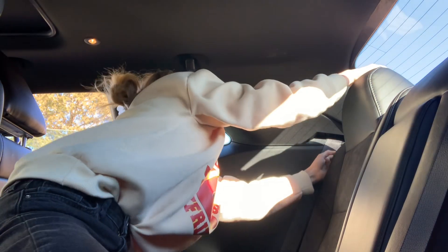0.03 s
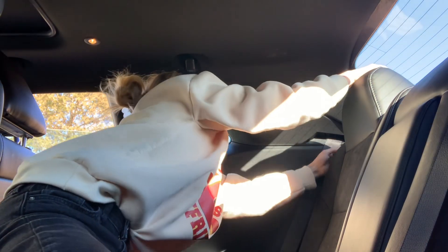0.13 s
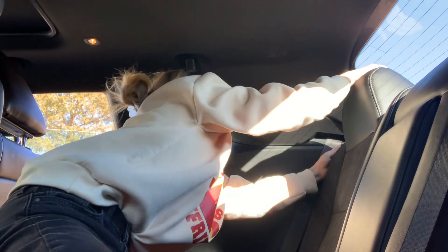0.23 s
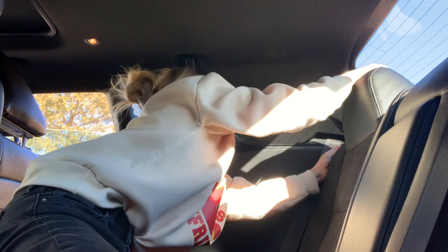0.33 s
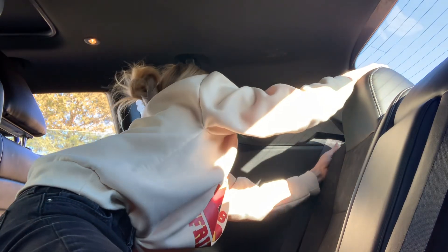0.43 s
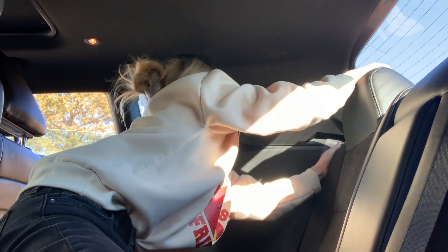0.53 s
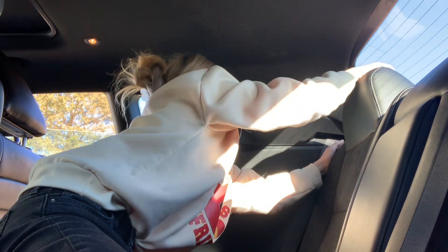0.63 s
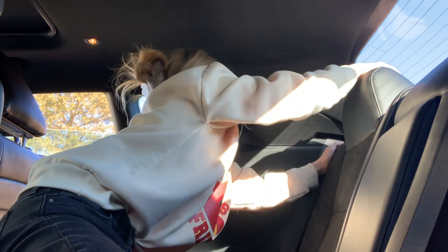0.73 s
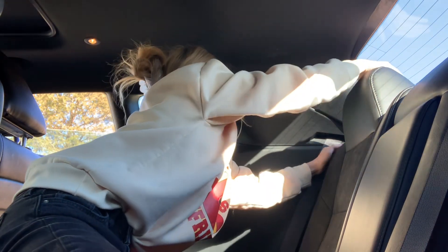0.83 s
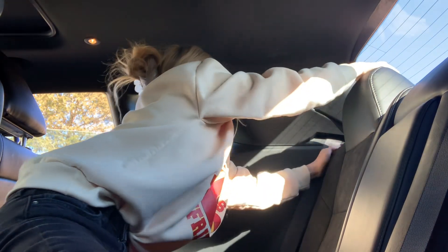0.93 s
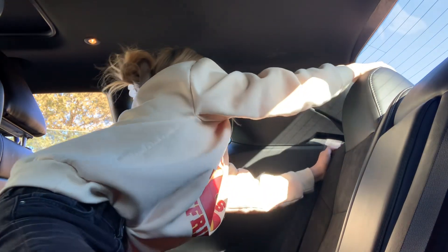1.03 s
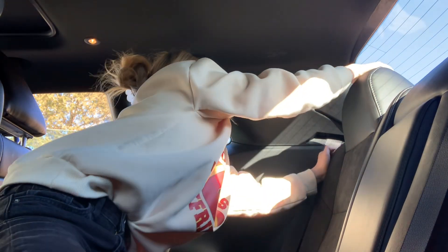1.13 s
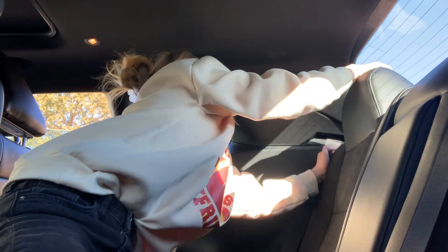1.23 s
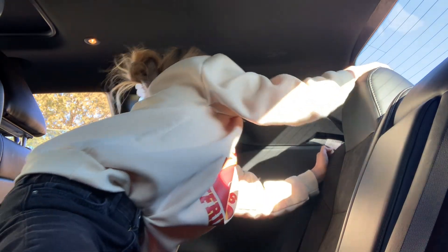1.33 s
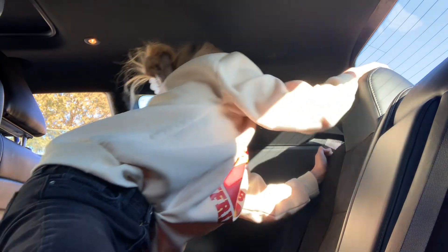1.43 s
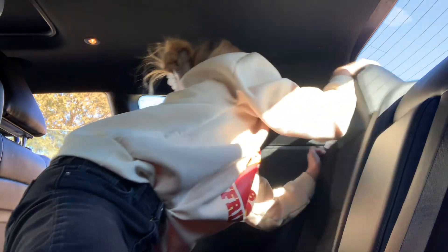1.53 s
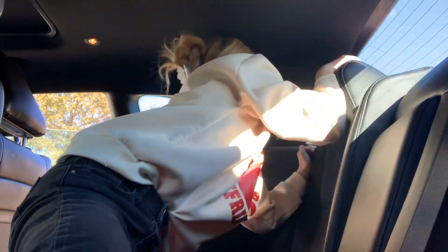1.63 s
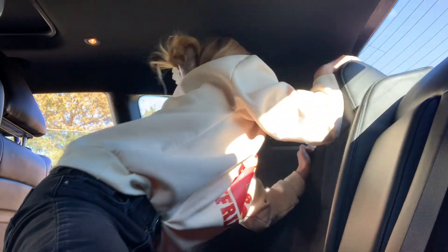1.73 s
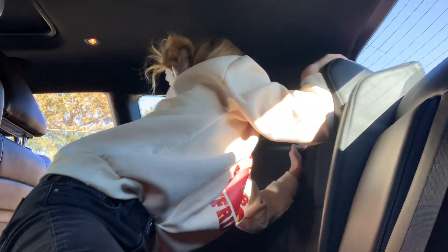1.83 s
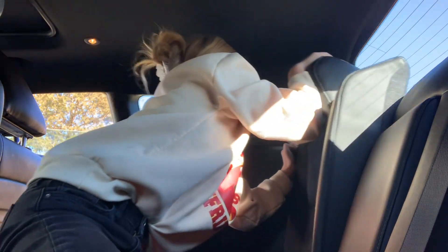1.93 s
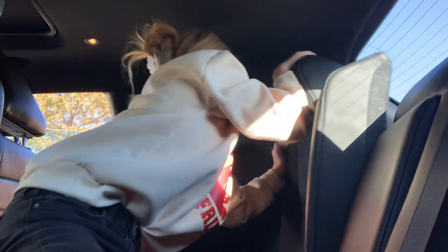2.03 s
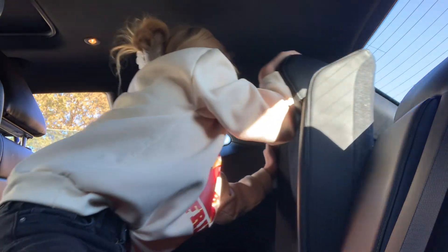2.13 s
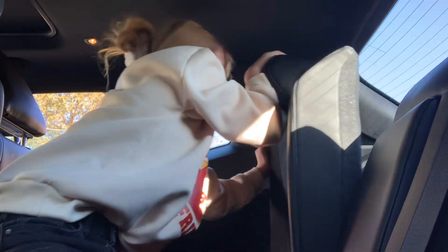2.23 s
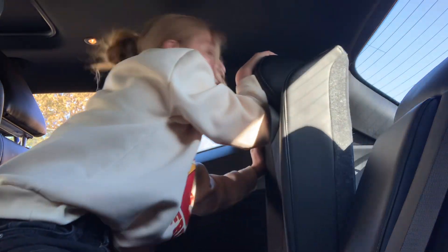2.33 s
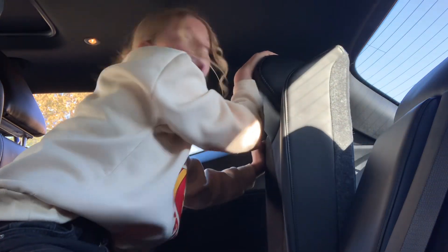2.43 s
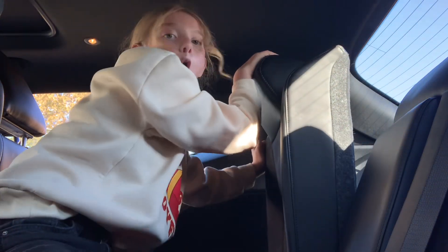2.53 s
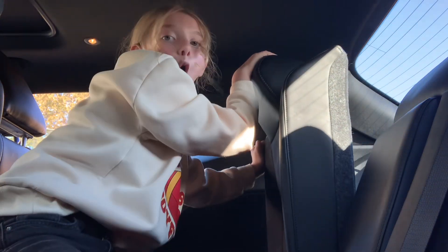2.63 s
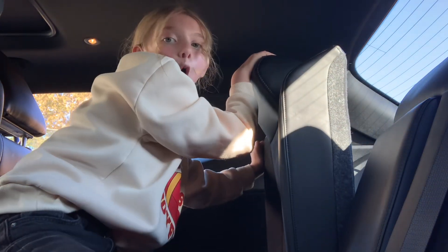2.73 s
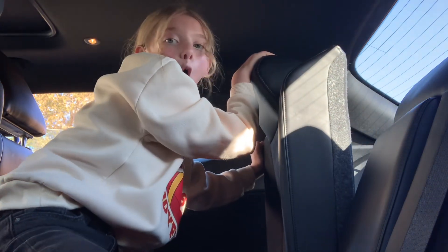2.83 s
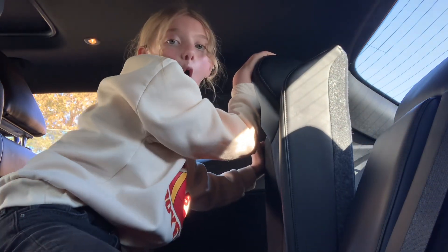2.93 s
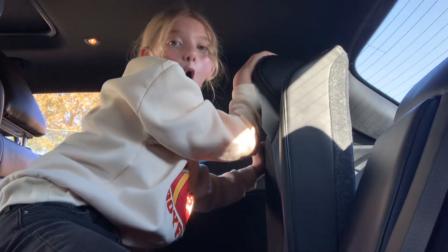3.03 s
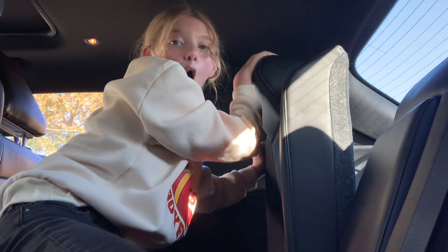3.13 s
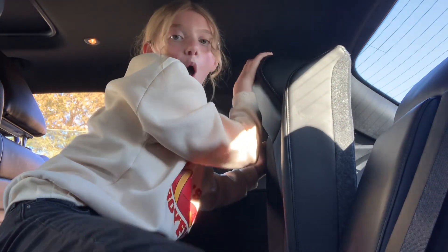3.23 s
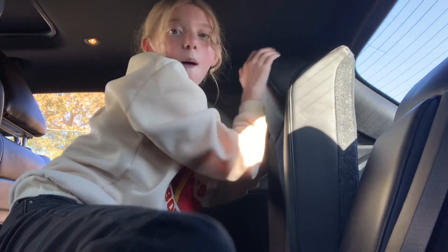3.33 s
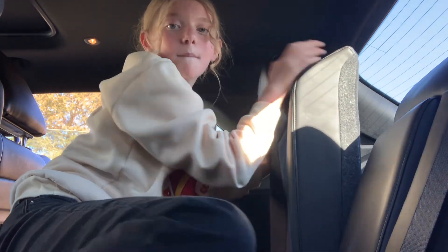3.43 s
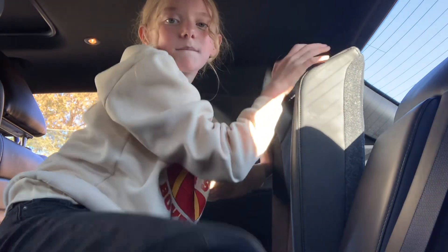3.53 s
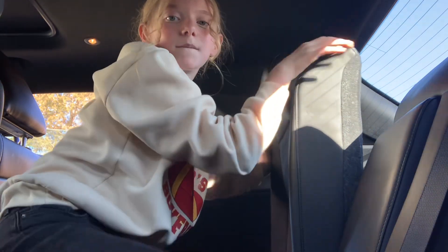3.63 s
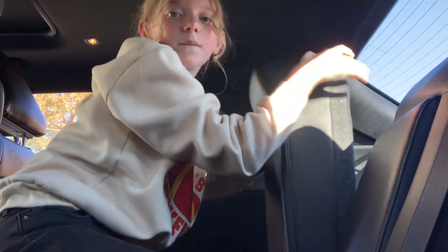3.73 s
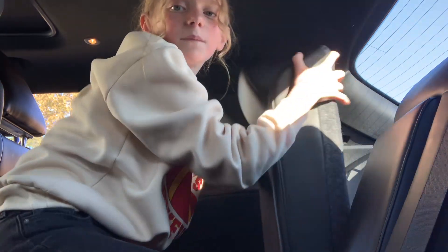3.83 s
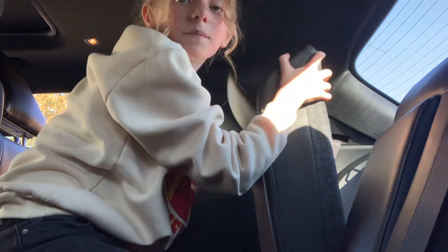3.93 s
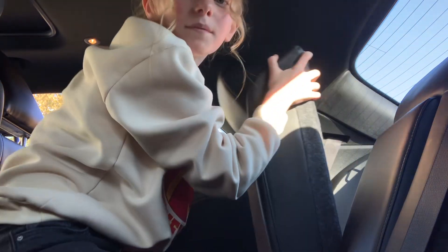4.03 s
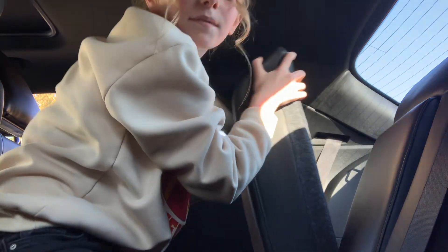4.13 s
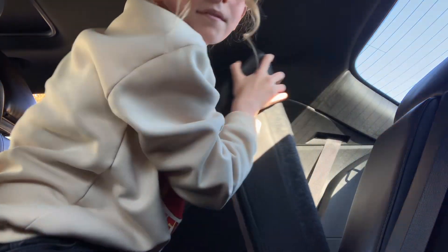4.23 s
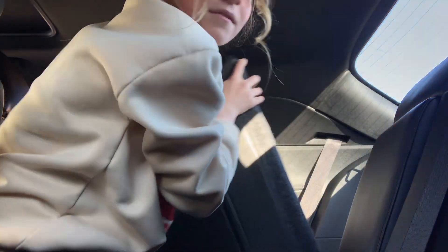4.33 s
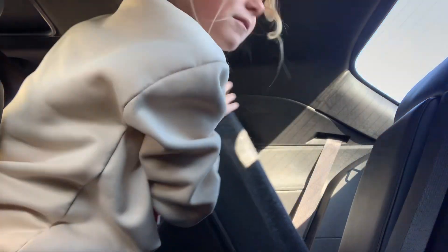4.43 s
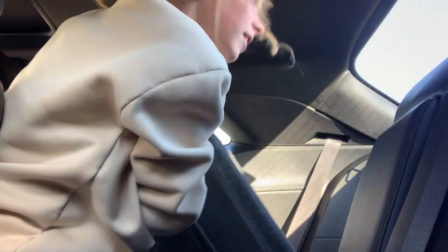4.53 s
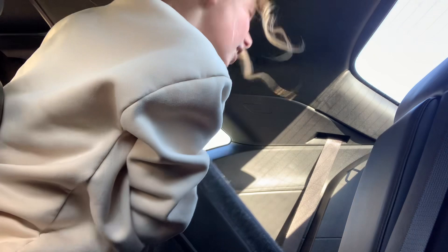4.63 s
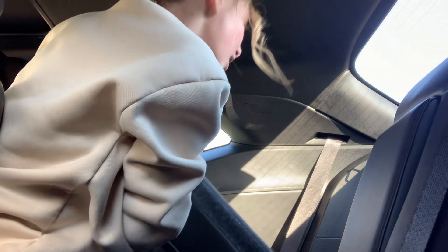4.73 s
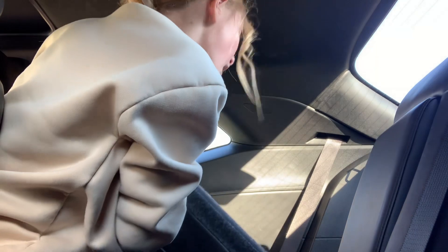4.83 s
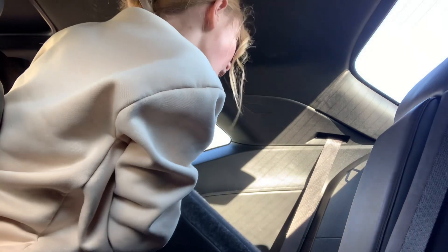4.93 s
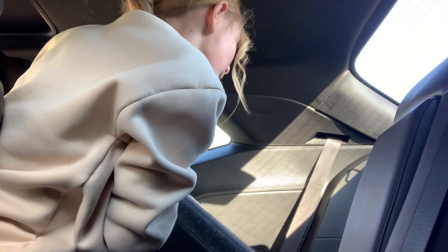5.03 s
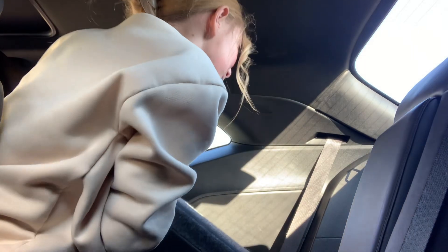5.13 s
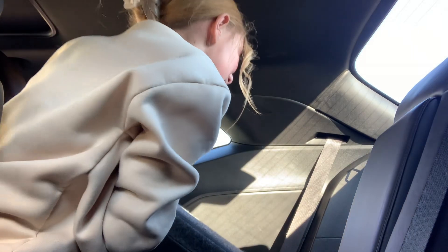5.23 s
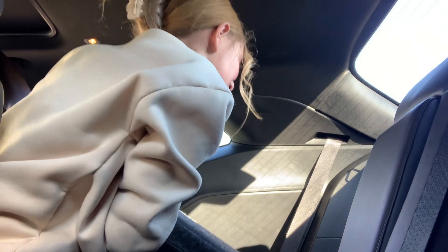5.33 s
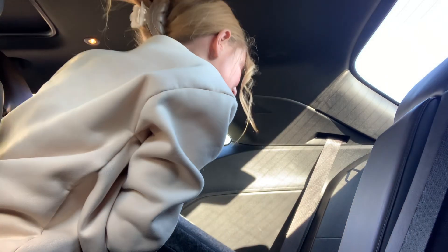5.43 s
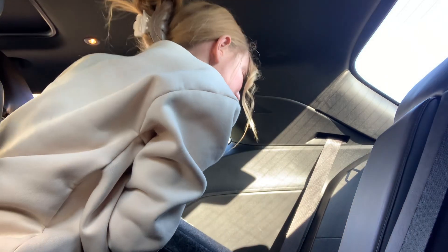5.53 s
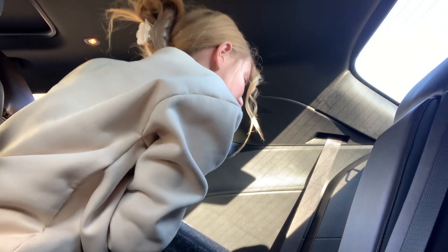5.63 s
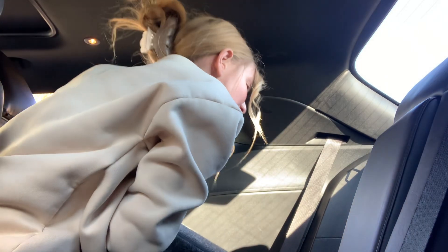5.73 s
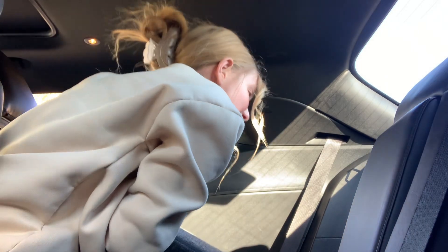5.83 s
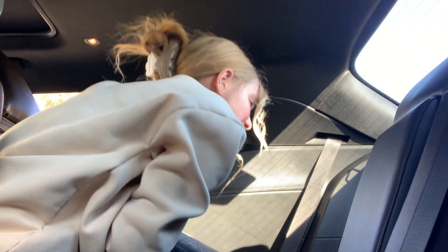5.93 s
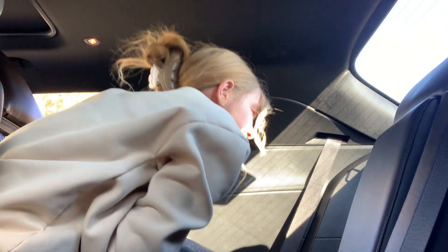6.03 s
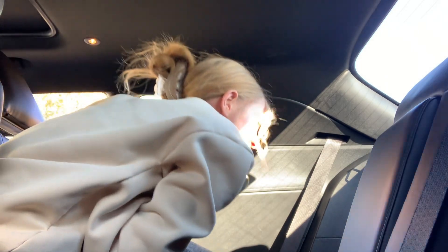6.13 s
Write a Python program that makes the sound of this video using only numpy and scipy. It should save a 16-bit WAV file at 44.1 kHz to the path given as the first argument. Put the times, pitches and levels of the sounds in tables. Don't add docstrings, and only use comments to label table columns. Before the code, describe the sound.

Very close stereo pickup in a dry, upholstered car cabin, with faint air and a low drone beneath. A deep swing of the floor dies away at the start. Around 0.3 to 0.5 s come a cluster of clicks, hollow knocks and dull bumps, then tiny leather squeaks at about 0.55 and 0.85 s. Low shoves and padded thuds return from 1.1 to 1.4 s. At 1.5 s the latch lets go: by far the loudest event, a heavy hollow thump in quick blows, ringing and rattling briefly. Creaking foam and brushing cloth follow until about 2.3 s, then a quieter stretch of faint rumble. From 3.2 s fabric rubs with soft knocks; a crisp, bright latch click with a small thud lands at 4.0 s. Gentle rubbing continues, and from 4.8 s dry crackles begin, growing densest and strongest from 5.8 s to the end near 6.2 s.

```python
import sys
import numpy as np
from scipy import signal
from scipy.fft import rfft, irfft, next_fast_len
from scipy.io import wavfile
from scipy.ndimage import uniform_filter1d

SR = 44100
rng = np.random.default_rng(int(sys.argv[2]) if len(sys.argv) > 2 else 0)


def volts_from_decibels(level):
    exponent = np.asarray(level, float) / 20
    return 10 ** exponent


def wrap_up_sound(samples):
    columns = np.atleast_2d(samples).T
    tamed = np.clip(columns, -1, 1)
    steps = np.round(tamed * 32767).astype(np.int16)
    wavfile.write(sys.argv[1], SR, steps)


N = 272978


def rms_one(x):
    return x / np.sqrt(np.mean(x ** 2) + 1e-20)


def at_hz(points, hz):
    table_hz, db = np.transpose(points)
    return np.interp(np.log(hz), np.log(table_hz), db)


def drift(rate_hz):
    r = np.exp(-80 * np.pi * rate_hz / SR)
    settle = 2000
    noise = rng.standard_normal(N // 40 + settle + 2)
    slow = signal.lfilter([1], [1, -2 * r, r * r], noise)[settle:]
    return np.interp(np.arange(N) / 40, np.arange(len(slow)), rms_one(slow))


def ring(force, hz, t60):
    r = volts_from_decibels(-60 / (t60 * SR))
    w = 2 * np.pi * hz / SR
    return signal.lfilter([0, np.sin(w)], [1, -2 * r * np.cos(w), r * r], force + 1e-18)


def soften(x, hz):
    r = np.exp(-2 * np.pi * hz / SR)
    return signal.lfilter([(1 - r) ** 2], [1, -2 * r, r * r], x)


def colour(x, spectrum):
    hz = np.maximum(np.fft.rfftfreq(N, 1 / SR), 1)
    closed = [(spectrum[0][0] / 2, -60)] + list(spectrum) + [(spectrum[-1][0] * 2, -60)]
    return rms_one(irfft(rfft(x) * volts_from_decibels(at_hz(closed, hz)), N))


def grains(per_s, spread_db):
    size_db = spread_db * np.minimum(rng.exponential(1, N), 5)
    sizes = volts_from_decibels(size_db) * rng.choice([-1, 1], N)
    return sizes * (rng.random(N) < per_s / SR)


def bursts(times, levels_db, t60, rise_s):
    out = np.zeros(N)
    for s, level_db, decay in zip(times, levels_db, np.broadcast_to(t60, len(times))):
        i = round(s * SR)
        decay = max(decay, .005)
        t = np.arange(min(int(2 * decay * SR), N - i)) / SR
        out[i:i + len(t)] += volts_from_decibels(level_db - 60 * t / decay) * (1 - np.exp(-t / rise_s))
    return out


def gestures(rows, rise_db_per_s, fall_db_per_s, rest_db):
    t = np.arange(0, N + 64, 64) / SR
    start, length, level_db, *colours = np.transpose(rows)[:, :, None]
    before_db = rise_db_per_s * np.maximum(start - t, 0)
    after_db = fall_db_per_s * np.maximum(t - start - length, 0)
    power = volts_from_decibels(2 * (level_db - before_db - after_db))
    at = np.minimum(t * SR, N - 1).astype(int)
    total = power.sum(axis=0) + volts_from_decibels(2 * np.broadcast_to(rest_db, N)[at])
    columns = [10 * np.log10(total)] + [(power * c).sum(axis=0) / total for c in colours]
    return [np.interp(np.arange(N) / SR, t, c) for c in columns]


def convolve(x, response):
    size = next_fast_len(N + SR)
    hz = np.maximum(np.fft.rfftfreq(size, 1 / SR), 1)
    return irfft(rfft(x, size) * response(hz), size)[:N]


# frequency in Hz, level in dB per Hz.
CABIN_AIR = [(18, -49), (35, 8.5), (70, -5), (122, -4), (216, -9.5), (500, -31), (1000, -33), (2900, -47.5),
             (5500, -57), (8250, -43), (12300, -53), (12900, -53), (16000, -87)]
# frequency in Hz, level in dB rms.
HUM = [(80.7, -67), (118.4, -63.5)]


def background():
    t = np.arange(N) / SR
    air = volts_from_decibels(-63 + 3.44 * drift(0.52)) * colour(rng.standard_normal(N), CABIN_AIR)
    drone = sum(volts_from_decibels(db + 4.0 + 2.8 * drift(1.46)) * np.sin(2 * np.pi * hz * t + 0.57 * drift(4.1))
                for hz, db in HUM)
    return air + drone


# level in dB, frequency in Hz, t60 in seconds.
EARLIER_SHOVE = (-29.5, 53, 0.39)


def earlier_shove():
    level_db, hz, t60 = EARLIER_SHOVE
    t = np.arange(N) / SR
    return volts_from_decibels(level_db - 60 * t / t60) * np.cos(2 * np.pi * hz * t)


# frequency in Hz, level in dB, t60 in seconds.
FRAME = [(43.75, -13.5, 0.59), (66, -19, 0.91), (74.34, -8.5, 0.29), (105.7, 3.5, 0.068),
         (124.4, -10, 0.097), (209, -24, 0.09)]
# time in seconds, rumble in dB.
WEIGHT = [
    (0, -53),
    (.27, -79),
    (.9, -57),
    (1.9, -65),
    (2.4, -49),
    (2.9, -69.5),
    (3.4, -61),
    (4.4, -49.5),
    (6.19, -59),
]
# start in seconds, length in seconds, rumble in dB.
SHIFTS = [(0.03, 0.013, -48), (.07, 0.11, -50), (.32, 0.04, -41), (.404, 0.034, -54), (.492, 0.017, -43),
          (.6, 0.057, -51), (.755, 0.11, -47.5), (1.011, 0.028, -48), (1.118, 0.081, -45.5),
          (1.23, 0.042, -37.5), (1.37, 0.026, -37.5), (1.45, 0.045, -45.5), (1.59, 0.18, -39.5),
          (1.8, 0.19, -48.5), (2.066, 0.072, -46), (2.14, 0.015, -42.5), (2.38, 0.014, -49),
          (3.17, 0.2, -52.5), (3.457, 0.18, -42), (3.723, 0.036, -44.5), (3.83, 0.011, -46.5),
          (4.102, 0.099, -47), (4.756, 0.016, -47), (4.852, 0.015, -46), (5.083, 0.2, -50.5),
          (5.64, .05, -47), (5.725, .03, -45.5), (5.795, 0.0078, -44.5), (5.91, 0.1, -51)]


def rumble():
    resting_db = np.interp(np.arange(N) / SR, *np.transpose(WEIGHT))
    rumble_db, = gestures(SHIFTS, rise_db_per_s=483, fall_db_per_s=344, rest_db=resting_db)
    shoves = soften(grains(per_s=200.0, spread_db=1.0), hz=300.)
    modes, sign = np.zeros(N), 1
    for (hz, db, t60), tilt_db in zip(FRAME, [-5.0, 8.0, 5.5, 2.0, 13.0, -4.5]):
        modes += sign * volts_from_decibels(db + tilt_db) * ring(shoves, hz, 0.51 * t60)
        sign = -sign
    level = np.sqrt(uniform_filter1d(modes ** 2, size=5000) + 1e-20)
    return volts_from_decibels(rumble_db - 2.06) * modes / level


# frequency in Hz, level in dB, t60 in seconds.
SHELL = [(269, 7, 0.14), (375, 9.5, 0.044), (422.6, -9.5, 0.1), (500, -16.5, 0.22), (574, -11.5, 0.1),
         (749, -18.5, 0.17), (906.5, -6.5, 0.054), (1070, -12, 0.13), (1376, -4, 0.092), (1520, -18, 0.12),
         (1683, -32, 0.06), (1920, 1, 0.0067), (2246, -25, 0.015), (4430, -38, 0.051)]
# frequency in Hz, level in dB per Hz.
CLICK = [(1500, -34), (2500, 15), (4000, 3), (5500, 4.5), (8000, 0.5)]
SNAP = [(4000, 8.5), (6500, 18), (8500, 28.5), (11500, 11.5), (13000, 15), (15500, -17)]
# time in seconds, peak in dB, click in dB relative to it,
# bright snap in dB relative to it, centre of the struck part in Hz.
KNOCKS = [(0.02, -60, -52, -45, 434), (0.035, -52, -36, -38, 500), (0.302, -47, -1.5, -12, 500),
          (0.3082, -41.5, -9, -4.5, 1230), (.312, -32, -15, -48, 490), (0.347, -45.5, -31, -29, 760),
          (0.421, -47.5, -13, -16, 500), (0.454, -36.5, -9, 1, 940), (0.46, -34.5, -14, -30, 584),
          (1.109, -53, -35, -40, 520), (1.14, -48.5, -25, -30, 354), (1.154, -55, -35, -40, 550),
          (1.205, -71, -21, -18, 300), (1.244, -58, -34, -39, 523), (1.341, -58, -35, -39, 300),
          (1.357, -58, -35, -40, 338), (1.49, -53, -19, -33, 2280), (1.497, -50, -29, -30, 1376),
          (1.529, -36, -22, -34, 1376), (1.546, -34, -32, -40, 500), (3.444, -56, -10, -1, 300),
          (3.553, -48, -31, -21, 384), (3.609, -49, -24, -11, 347), (3.841, -70, -13, -2, 280),
          (3.974, -46.5, -2.5, -30, 597), (4.0063, -45, 13.5, -6, 1670), (4.0092, -39.5, 12, -0.5, 1790),
          (4.01, -41, -3, -17, 370), (4.021, -35.5, -44, -40, 278), (4.002, -47, -32, -40, 900),
          (4.035, -60, -25, -30, 690), (4.218, -60.5, -2, -13, 840), (5.731, -59, -35, -35, 300),
          (5.776, -54, -35, -35, 380), (5.846, -48, -30, -40, 527), (5.855, -46, -6, -33.5, 700)]


def knocks():
    s, peak_db, click_db, snap_db, centre_hz = np.transpose(KNOCKS)
    click = bursts(s, peak_db + click_db + 0.5, 0.0043, rise_s=0.000088)
    snap = bursts(s, peak_db + snap_db, 0.017, rise_s=0.00031)
    out = click * colour(rng.standard_normal(N), CLICK)
    out += snap * colour(rng.standard_normal(N), SNAP)
    grit = rng.standard_normal(N)
    for hz, db, t60 in SHELL:
        reach_db = -12.0 * np.abs(np.log2(hz / centre_hz))
        rattle = bursts(s, peak_db + 0.6 * db + reach_db - 14.5, 0.0087, rise_s=0.000086)
        out += ring(np.roll(grit, int(hz)) * rattle, hz, 0.3 * t60)
    return out


# frequency in Hz, level in dB per Hz.
CREAK = [(250, 5.5), (380, -6), (500, -4.5), (620, 0.5), (780, -5.5), (1000, -6.5), (1400, -3),
         (2000, -14.5)]
GROAN = [(120, -39), (190, -5.5), (280, -10), (360, -12.5), (500, -17.5)]
# start in seconds, length in seconds, creak in dB,
# deeper part in dB relative to it.
PRESSES = [(.02, 0.026, -81, 28), (.17, 0.0083, -78.5, 6), (.36, 0.079, -82.5, 15), (.5, 0.11, -84, -16),
           (.75, 0.24, -86, 11.5), (1.1, 0.11, -78, 14), (1.25, 0.22, -85, 18), (1.46, 0.17, -72.5, 0),
           (1.7, 0.26, -72, 3.5), (1.92, 0.17, -73, 6.5), (2.14, 0.33, -78, 2), (2.56, 0.33, -88.5, 3),
           (3.15, 0.12, -80.5, 14), (3.45, 0.32, -76, 4), (3.68, 0.14, -70.5, 4.5), (3.96, 0.037, -71, 0),
           (4.04, 0.016, -77.5, 17), (4.21, 0.22, -85, -14), (4.54, 0.059, -81, 4.5), (4.7, 0.33, -76, -9),
           (4.92, 0.14, -73, -12), (5.1, 0.34, -78, -1.5), (5.72, 0.079, -79.5, 11.5),
           (5.84, 0.038, -76.5, -3), (5.95, 0.28, -74, -9)]


def cushion():
    creak_db, deep_db = gestures(PRESSES, rise_db_per_s=302, fall_db_per_s=252, rest_db=-91.5)
    slips = grains(per_s=2500 * volts_from_decibels(2.5 * drift(25)), spread_db=2.5)
    layers = colour(slips, CREAK) + volts_from_decibels(deep_db - 1.5) * colour(slips, GROAN)
    return volts_from_decibels(creak_db + 3.0) * layers


# time in seconds, level in dB.
THUDS = [(0.032, -40), (0.36, -36), (0.418, -43.5), (0.4757, -31), (.492, -36.5), (0.507, -44),
         (0.519, -39), (1.145, -34.5), (1.247, -34.5), (1.357, -35), (3.556, -57), (3.846, -47),
         (4.017, -37.5), (4.218, -53)]


def thuds():
    s, level_db = np.transpose(THUDS)
    bumps = np.zeros(N)
    bumps[np.round(s * SR).astype(int)] = volts_from_decibels(level_db)
    bumps = soften(bumps, 470.0)
    return -sum(volts_from_decibels(db - 2.0 * np.log2(hz / 70)) * ring(bumps, hz, 0.55 * t60) for hz, db, t60 in FRAME)


# frequency in Hz, level in dB per Hz.
HISS = [(3500, -77), (5000, -2), (6500, -0.5), (8000, -1), (9500, 1.5), (11000, -6.5)]
RUB = [(760, -70), (1300, -5), (2250, -3), (2650, -3.5), (3040, 0.5), (5500, -5.5), (7150, -21),
       (12100, -120)]
SHEEN = [(8500, -0.5), (10000, -5), (11800, -1.5), (12600, -4.5), (13200, -6.5), (15500, -10.5),
         (16000, -41)]
# start in seconds, length in seconds, hiss in dB,
# duller rub in dB relative to it, thin top in dB relative to it.
STROKES = [(.06, 0.097, -80.5, -5, -3), (.415, 0.018, -86, 12, 1), (.93, 0.13, -77, -3.5, -6.5),
           (1.09, 0.085, -75, 3, -0.5), (1.22, 0.32, -78.5, 3.5, -8), (1.51, 0.094, -69, 7.5, 20.5),
           (1.64, 0.056, -69.5, -3, -4.5), (1.75, 0.3, -65.5, 0.5, 10.5), (2.07, 0.11, -67.5, -4, 0.5),
           (2.18, 0.13, -80, 2, -8), (3.17, 0.1, -68.5, -4.5, 2), (3.3, 0.057, -78, -2, -11),
           (3.46, 0.035, -72.5, 1, -1), (3.53, 0.1, -64, -5, -4.5), (3.69, 0.15, -66.5, 1, 3.5),
           (3.955, 0.021, -74, 2, -10.5), (4.02, 0.051, -77.5, 2.5, -13), (4.2, 0.063, -80, 3, 10.5),
           (4.45, 0.45, -74.5, -2.5, -3), (4.92, 0.17, -69.5, -2.5, -4), (5.14, 0.062, -72.5, -0.5, 3.5),
           (5.27, 0.2, -84.5, 8, 11), (5.66, 0.062, -78.5, -2, -2), (5.79, 0.069, -79.5, 6, -2),
           (5.94, 0.076, -71, -2, 12.5), (6.045, 0.0084, -61.5, -1, 7), (6.11, 0.042, -70.5, 4, 5)]


def cloth():
    hiss_db, dull_db, top_db = gestures(STROKES, rise_db_per_s=368, fall_db_per_s=245, rest_db=-85)
    fibres = grains(per_s=12000 * volts_from_decibels(1.2 * drift(17)), spread_db=2.5)
    layers = volts_from_decibels(2.2 * drift(18)) * colour(fibres, HISS)
    layers += volts_from_decibels(dull_db - 1.4 + 1.05 * drift(7.3)) * colour(fibres, RUB)
    layers += volts_from_decibels(top_db - 1.3 + 0.43 * drift(4.7)) * colour(fibres, SHEEN)
    return volts_from_decibels(hiss_db - 0.06 + 0.3 * drift(44)) * layers


# time in seconds,
# level in dB, frequency in Hz, t60 in seconds.
PINGS = [(0.305, -49, 380, .06), (0.309, -39, 500, 0.054), (0.31, -48, 1380, 0.034),
         (0.309, -41, 1090, .04), (0.316, -46, 330, 0.073), (0.328, -45, 434, 0.036),
         (0.348, -45.5, 490, .04), (0.414, -50, 483, .04), (0.424, -62, 554, .05), (0.35, -66, 1440, .03),
         (0.456, -55, 1500, .03), (0.457, -50.5, 787, 0.072), (0.458, -62, 470, .04),
         (0.464, -54, 400, 0.029), (1.001, -45, 188, 0.12), (1.4905, -36, 2300, .035),
         (1.4898, -21, 374.6, 0.1), (1.491, -16, 275, 0.154), (1.493, -28, 176, 0.28),
         (1.4955, -35, 2085, 0.039), (1.4953, -32, 1376, 0.12), (1.498, -35, 450, 0.1),
         (1.5, -31, 712, 0.15), (1.504, -41, 1010, 0.12), (1.505, -46, 1780, .08), (1.507, -52, 2580, .06),
         (1.519, -30.5, 415, .08), (1.527, -38.5, 780, 0.043), (1.528, -48, 2080, 0.052),
         (1.533, -48, 2500, 0.056), (1.531, -33, 1376, 0.058), (1.544, -36, 496, 0.11),
         (1.546, -44, 614, .12), (3.551, -54.5, 970, 0.043), (4.005, -41.5, 860, 0.038),
         (4.0066, -40, 1680, 0.079), (4.007, -52, 2110, .04), (4.005, -44.5, 3130, 0.067),
         (4.0087, -60, 4110, .05), (4.009, -35, 401, 0.1), (4.01, -51.5, 519, 0.28),
         (4.011, -52, 670, 0.066), (4.012, -32.5, 257, 0.11), (4.02, -58, 1390, 0.082),
         (4.027, -59, 1004, 0.083)]


def pings():
    out = np.zeros(N)
    for s, level_db, hz, t60 in PINGS:
        i = round(s * SR)
        pluck = np.zeros(min(SR // 2, N - i))
        pluck[0] = volts_from_decibels(level_db)
        out[i:i + len(pluck)] += ring(soften(pluck, 2 * hz), hz, t60)
    return out


# start in seconds, length in seconds, start pitch in Hz, end pitch in Hz,
# level in dB.
SQUEAKS = [
    (0.541, 0.073, 455, 450, -75),
    (0.832, 0.036, 470, 449, -76),
    (3.96, 0.027, 397, 370, -77),
    (5.226, 0.082, 1330, 1437, -84),
]


def squeaks():
    out, waver = np.zeros(N), drift(60)
    loudness_waver = np.roll(waver, SR)
    partials_db = [-19.0, 15.0, -14.0, -2.5, -56, -29, -7.0, -13]
    for s, length, start_hz, end_hz, level_db in SQUEAKS:
        i, n = round(s * SR), round(length * SR)
        hz = np.linspace(start_hz, end_hz, n) * (1 + .01 * waver[i:i + n])
        phase = 2 * np.pi * np.cumsum(hz) / SR
        tone = sum(volts_from_decibels(db) * np.sin(k * phase) for k, db in enumerate(partials_db, 1))
        swell = np.hanning(n) ** .3 * np.linspace(1.3, .6, n)
        out[i:i + n] += volts_from_decibels(level_db + 3 * loudness_waver[i:i + n]) * tone * swell
    return out


# time in seconds, blow on the shell in dB, push into the frame in dB,
# direction as a sign, contact softness in Hz.
RELEASE = [
    (1.48, -43, -54, 1, 942),
    (1.4932, -26, -41, -1, 696),
    (1.4968, -32.5, -16, -1, 576),
    (1.5002, -51, -12, 1, 500),
    (1.508, -45, -42, 1, 500),
    (1.522, -43, -52, -1, 508),
    (1.538, -37.5, -22.5, -1, 400),
    (1.555, -52, -30, 1, 380),
]
# time in seconds, level in dB, t60 in seconds.
RATTLE = (1.505, -61.5, 0.25)


def release():
    blow, push = np.zeros((2, N))
    for s, blow_db, push_db, direction, soft_hz in RELEASE:
        click = np.zeros(N)
        click[round(s * SR)] = np.sign(direction)
        click = soften(click, soft_hz)
        blow += volts_from_decibels(blow_db) * click
        push += volts_from_decibels(push_db) * click
    s, blow_db = np.transpose(RELEASE)[:2]
    shake = bursts(s, blow_db - 22.5, 0.039, rise_s=0.00044)
    shake += bursts(*np.transpose([RATTLE]), rise_s=0.0012) * volts_from_decibels(3.5 * drift(31))
    grit = rng.standard_normal(N)
    out = sum(volts_from_decibels(db) * ring(push, hz, t60) for hz, db, t60 in FRAME)
    for hz, db, t60 in SHELL:
        force = volts_from_decibels(-7.0) * blow + volts_from_decibels(-3.5) * shake * np.roll(grit, int(hz))
        out += volts_from_decibels(db) * ring(force, hz, 0.62 * t60)
    return out + volts_from_decibels(8) * shake * colour(rng.standard_normal(N), CLICK)


# time in seconds, peak in dB, thin top in dB relative to it.
CRACKLES = [(4.776, -61, -25), (4.804, -53, -22), (4.8186, -46, -25), (4.9152, -56, -23), (4.9746, -63, -9),
            (5.005, -52.5, -2), (5.0194, -65, 7), (5.0524, -63, 8), (5.0624, -60, -3), (5.088, -48.5, -10),
            (5.1466, -48, -5.5), (5.1647, -54, -8), (5.181, -44, -15), (5.1974, -55, -16),
            (5.246, -57.5, -8), (5.2653, -60, -2), (5.277, -47, -10), (5.303, -56, 7.5), (5.319, -60, 3),
            (5.3436, -54, -9), (5.3933, -54, -13), (5.405, -56, -2), (5.426, -54, 1), (5.4348, -40.5, -26),
            (5.4574, -64, 1), (5.475, -51.5, -6), (5.5159, -69, 1), (5.572, -66, 2.5), (5.6002, -66.5, 3.5),
            (5.66, -56, -5), (5.68, -49, -17), (5.695, -56.5, -5), (5.761, -52.5, -18), (5.7902, -55, -18),
            (5.805, -62, 2), (5.8162, -53.5, -2), (5.835, -46, -11), (5.8496, -43, -17), (5.8704, -51, -9),
            (5.8888, -50.5, -2.5), (5.9026, -61, -14), (5.9174, -58, 0), (5.9372, -43, -9),
            (5.9602, -42.5, -8), (5.981, -44, -8), (6.0008, -43, -11), (6.0163, -42.5, -8),
            (6.0364, -53, -8), (6.0472, -47, -9), (6.0556, -40, -17), (6.0654, -56, -7), (6.083, -54, 2),
            (6.1053, -42, -8), (6.1164, -59, -5), (6.1274, -50, -8), (6.1468, -41, -23),
            (6.165, -44.5, -12), (6.1747, -46.5, -13)]


def crackles():
    s, peak_db, top_db = np.transpose(CRACKLES)
    slips = grains(per_s=14000.0, spread_db=2.5)
    snap = bursts(s - .0005, peak_db - 5.5, 0.008, rise_s=0.0002)
    tail = bursts(s - .001, peak_db - 10.0, 0.063, rise_s=0.00076)
    top = bursts(s - .001, peak_db + top_db + 3, 0.032, rise_s=0.001)
    return (snap + tail) * colour(slips, HISS) + top * colour(slips, SHEEN)


def cabin(x):
    t = np.arange(SR // 4) / SR
    t60, first_s = 0.045, .002
    tail = rng.standard_normal(len(t)) * volts_from_decibels(-60 * t / t60) * (t > first_s)
    return signal.fftconvolve(x, tail / np.sqrt(np.sum(tail ** 2)))[:N]


# frequency in Hz, level in dB.
UNALIKE = [(30, -6.5), (120, -14), (260, -8.5), (500, -5.5), (800, 7.5), (1200, -7), (2400, 0.5), (4500, 3),
           (9000, -15)]


def own_side(hits, steady):
    paths = sum(drift(5.0) * cabin(steady) for path in range(4)) / 2
    direct_hits = volts_from_decibels(-7) * cabin(hits)
    return convolve(paths + direct_hits, lambda hz: volts_from_decibels(at_hz(UNALIKE, hz)))


def scene():
    hits = knocks() + thuds() + pings() + release() + crackles()
    hits = hits + volts_from_decibels(-24) * cabin(hits) + squeaks()
    near = background() + rumble() + cushion() + cloth()
    shared = hits + near + earlier_shove()
    return np.array([shared + own_side(hits, near) for side in "LR"])


def roll_off(x):
    return signal.sosfilt(signal.butter(12, 16540, fs=SR, output="sos"), x)


# frequency in Hz, half turns by which left trails right.
SPREAD = [(15, 0), (50, .33), (150, .55), (225, .95), (270, 1.17), (340, 1.33), (510, 2), (670, 3),
          (830, 4), (1000, 6.1), (1250, 7), (1400, 6.5), (1750, 6.6), (1900, 6), (2250, 6), (2600, 5),
          (3300, 5.05), (3800, 4.1), (4100, 4), (5300, 3), (7000, 2), (9400, 1), (11300, 0), (13200, -1),
          (15000, -2), (22050, -6)]


def record(dry):
    dry = signal.sosfilt(signal.butter(2, 43.0, "high", fs=SR, output="sos"), dry)
    hz, half_turns = np.transpose(SPREAD)
    left = convolve(dry[0], lambda f: np.exp(-1j * np.pi * np.interp(f, hz, half_turns)))
    return roll_off(np.array([left, dry[1]]))


dry = scene()
out = record(dry)
wrap_up_sound(out)
```